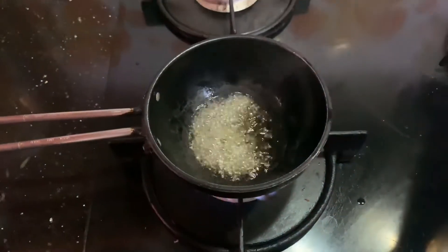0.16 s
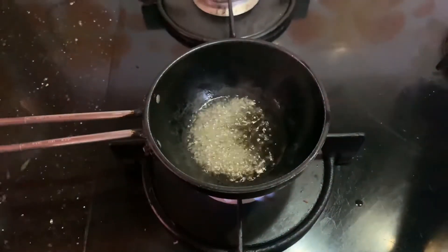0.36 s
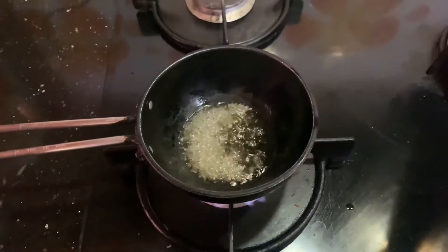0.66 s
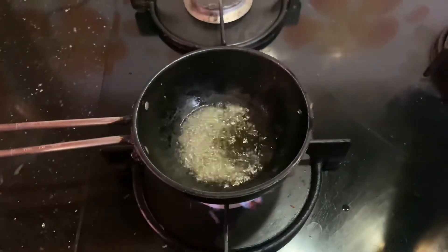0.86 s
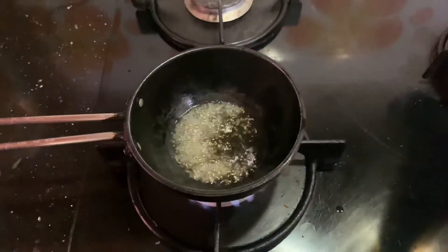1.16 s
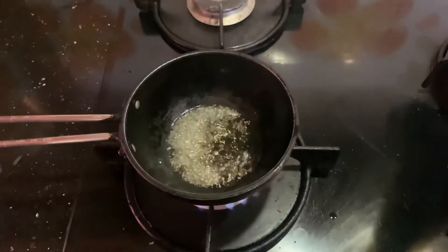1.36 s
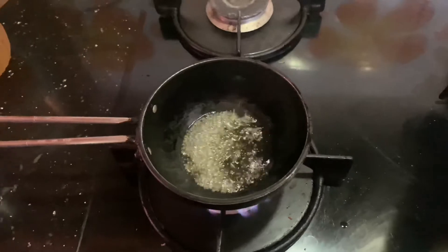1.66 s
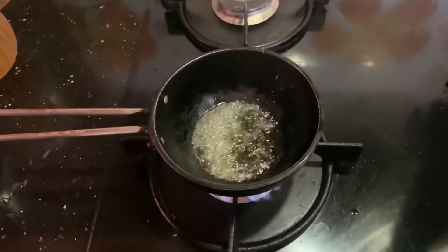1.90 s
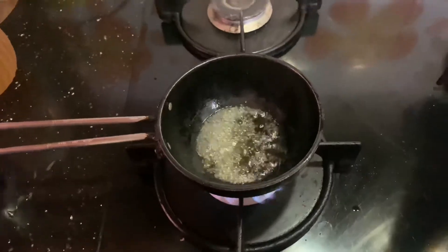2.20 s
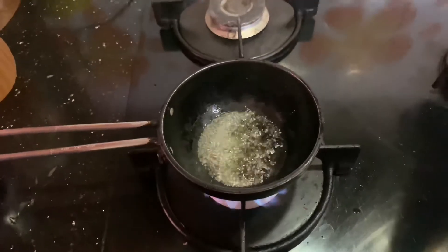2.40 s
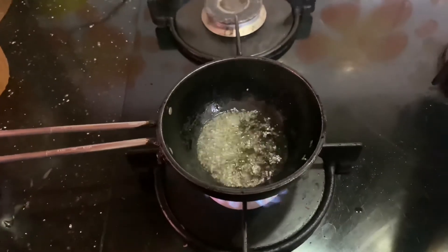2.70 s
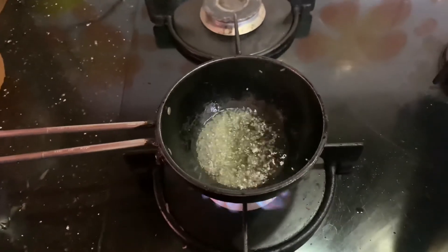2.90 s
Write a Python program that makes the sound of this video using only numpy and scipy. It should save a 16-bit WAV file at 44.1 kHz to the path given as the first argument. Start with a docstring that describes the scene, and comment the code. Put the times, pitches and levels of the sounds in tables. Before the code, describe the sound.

Mustard seeds crackle in hot oil in a small pan, heard very close and dry in stereo. Sparse crisp snaps and short plops begin near 0.2 s, cluster at 0.6-0.7, thin around 1.0, then thicken from 1.6, crowding from 2.3 and peaking near 2.75 before easing. Faint fizz and low flame rumble lie beneath; soft low thuds fall at 0.7, 0.9 and 2.7 s.

```python
"""Mustard seeds burst in hot oil in a small steel pan, a phone held just above it.
From the start a gas flame rumbles and roars, as filtered noise whose level dips at times, under the flickering
noise of fizz and the small crackle of the oil. The first bursts follow: each crack is a short noisy pulse with
a decaying spray, and plops are brief rising tones that set the bowl ringing. Low falling thuds, of lengthening
swings, sound near 0.7, 0.9 and 2.7 s, the last amid bursts that crowd from about 2.3 s and thin out at the end."""
import sys
import numpy as np
from scipy import signal
from scipy.fft import rfft, irfft, next_fast_len
from scipy.io import wavfile
from scipy.ndimage import uniform_filter1d

SR = 44100
rng = np.random.default_rng(int(sys.argv[2]) if len(sys.argv) > 2 else 0)


def voltage_ratio(level):
    """Linear amplitude factor for a level in decibels (scalar or array-like)."""
    return 10 ** (np.asarray(level, float) / 20)


def digitize_waveform(pressure):
    """Quantize a signal to 16-bit integers and store it at the path in sys.argv[1].

    Rows of a 2-D input are taken as channels; values are limited to [-1, 1].
    """
    field = np.atleast_2d(pressure).T
    bounded = np.clip(field, -1, 1)
    quanta = np.round(bounded * 32767).astype(np.int16)
    wavfile.write(sys.argv[1], SR, quanta)


N = 134505

# Cracks of bursting seeds. Each row: start in seconds, relative level in dB, pitch in Hz,
# relative level of the spray in dB.
SEED_CRACKS = [(0.199, -9.5, 7540, -28), (0.406, -18.5, 7400, -36.5), (0.4373, -22.5, 12400, -39),
               (0.482, -14, 12430, -41), (0.5796, -17.5, 8000, -27), (0.611, -19, 10400, -21),
               (0.6174, -8, 12100, -23), (0.6438, -7.5, 11990.0, -29), (0.6542, -7, 13800, -21.5),
               (0.6606, -13, 7800.0, -23), (0.6906, -6.5, 13500, -31), (0.695, -17, 15120.0, -28),
               (0.7017, -6.5, 10200, -27), (0.7063, -16.5, 13010.0, -25), (0.7106, -9.5, 12900.0, -31),
               (0.8765, -11, 13400, -28), (0.89, -11.5, 14000, -24.5), (0.9006, -8, 13200, -36),
               (1.0086, -15, 12700, -35), (1.0303, -11.5, 14100, -41), (1.156, -14.5, 15300, -28.5),
               (1.187, -16, 8820, -24.5), (1.2267, -9.5, 12030, -28.5), (1.2758, -21, 13780.0, -34.5),
               (1.3162, -7.5, 12130, -29), (1.322, -17, 13200, -34), (1.3875, -12, 9960, -42),
               (1.3954, -17.5, 12120.0, -34), (1.4203, -15, 9400, -38), (1.4831, -13.5, 8800, -31.5),
               (1.4936, -19, 8010.0, -32), (1.534, -17, 9070.0, -33), (1.5574, -18.5, 8900, -50),
               (1.5971, -14.5, 7600, -25.5), (1.6113, -7.5, 12040.0, -23), (1.6133, -13, 9200, -27.0),
               (1.6242, -18, 10600, -17), (1.654, -16, 12400, -30), (1.6767, -20.5, 7800, -21.5),
               (1.6866, -8.5, 11300.0, -23), (1.696, -17, 12580.0, -36), (1.732, -14, 5510.0, -25),
               (1.7362, -14, 9220.0, -33.5), (1.7748, -13.5, 8270, -38), (1.8002, -7.5, 13800.0, -30),
               (1.8153, -17.5, 7700, -29), (1.8361, -19, 8850.0, -32), (1.86, -7.5, 12600, -31),
               (1.8754, -10.5, 12770.0, -30.0), (1.884, -9.5, 14700, -27), (1.8956, -10.5, 12210.0, -32),
               (1.9521, -11.5, 8200, -25), (1.9809, -8.0, 14400, -38), (2.0366, -12, 8700, -31),
               (2.0553, -9.5, 13300, -26.0), (2.093, -7.5, 13500, -27), (2.117, -7.5, 8550, -30),
               (2.1538, -8.5, 12400, -29.5), (2.1855, -15.5, 7490.0, -30), (2.2115, -15, 5510.0, -30),
               (2.2258, -11, 12300, -27), (2.2625, -9, 7600, -30.5), (2.2802, -13, 12800, -31),
               (2.297, -13.5, 13030.0, -27), (2.302, -9.5, 8830.0, -26.5), (2.3134, -12, 12100, -31),
               (2.3556, -19, 13500, -37.0), (2.3692, -8.5, 12800, -26), (2.3768, -20, 12360.0, -36),
               (2.381, -17, 8720.0, -36), (2.3916, -12, 12920.0, -25), (2.4066, -13.5, 11000, -22),
               (2.411, -22, 6700.0, -26), (2.4356, -8.5, 14700, -23.5), (2.449, -17.0, 10420.0, -24.5),
               (2.466, -18, 14100, -24.5), (2.48, -15, 7360, -27), (2.493, -22, 8760.0, -34.5),
               (2.5033, -14, 7950.0, -37.5), (2.515, -7, 11860.0, -28), (2.5296, -8, 8900, -21.5),
               (2.5334, -12, 7950, -25), (2.5377, -13, 7200, -29), (2.545, -15, 11700, -31),
               (2.5682, -17, 13160.0, -28), (2.5737, -18, 7150.0, -28), (2.6004, -14, 5370, -23.5),
               (2.6282, -20, 5510.0, -42), (2.691, -18, 6900, -31.0), (2.697, -14, 9000, -33.0),
               (2.7199, -8, 9470, -24.5), (2.726, -19, 14700, -23.5), (2.7367, -21.5, 13330.0, -30.0),
               (2.7467, -9.5, 8310.0, -21), (2.7501, -17, 5460, -23), (2.7594, -9, 7860.0, -20),
               (2.7668, -25, 13980.0, -17.5), (2.7744, -18, 12800, -21), (2.7813, -14.5, 14840.0, -21.5),
               (2.7885, -22, 15100, -25), (2.8203, -28, 8700, -26), (2.8333, -16.5, 11390.0, -29.5),
               (2.8726, -14, 9000, -32), (2.8877, -7.5, 14300, -25.5), (2.93, -9, 13600, -32),
               (2.9491, -11.5, 11540, -23.5), (2.9686, -19, 13090.0, -32.0), (3.0106, -23.5, 14800, -43),
               (3.0228, -33, 9430.0, -50.5), (3.0325, -13.5, 10140.0, -28)]
CRACK_WIDTH_S = .00016  # standard deviation of the bell-shaped pulse
SPRAY_T60_S, SPLASH_T60_S = 0.16, 0.014
DROPLET_WANDER_DB = 6  # per unit of wander
SPRAY_TOP_DB = -5  # at 16 kHz: the late spray is duller than the splash

# Duller plops of steam and oil. Each row: start in seconds, relative level in dB, pitch in Hz,
# relative level of the bowl's ring in dB.
STEAM_PLOPS = [(0.1657, -14, 1290, -23), (0.2012, -22, 4740, -31), (0.365, -16, 990, -37),
               (0.3734, -17.5, 5120, -31), (0.4398, -39, 1290, -35.5), (0.482, -5.5, 3040, -22.5),
               (0.5487, -24.5, 1330, -29.5), (0.5809, -23, 1240, -29), (0.6112, -3.5, 2920, -44),
               (0.6165, -22, 1310, -39), (0.6444, -24, 1370, -38), (0.6532, -22.5, 1220, -35),
               (0.69, -11.5, 5340, -54), (0.7015, -30, 1260, -33), (0.712, -33, 4690, -47),
               (0.877, -8, 4070, -28.5), (0.8996, -20, 1220, -52), (0.994, -29, 3580, -36.5),
               (1.128, -29, 1130, -35), (1.158, -50, 4160, -34), (1.1864, -19, 2830, -26),
               (1.189, -16, 3330, -31), (1.289, -23, 1350, -33.5), (1.396, -46, 1340, -38),
               (1.4735, -26, 1400, -34.5), (1.4822, -26, 1340, -39), (1.6, -11, 5070, -24.5),
               (1.613, -9, 4700, -30), (1.6262, -11, 2890, -22), (1.6551, -6.5, 1810, -24),
               (1.6966, -19, 1300, -25), (1.7041, -16, 1570, -28.5), (1.7308, -8, 5300, -33),
               (1.736, -12.5, 3760, -49), (1.775, -23, 2940, -50), (1.8158, -15, 3560, -28),
               (1.8608, -22, 1300, -33), (1.875, -35, 4010, -38), (1.9446, -21, 1890, -32),
               (1.952, -9, 5400, -34), (2.038, -27, 1330, -42), (2.0925, -17, 5100, -41),
               (2.1153, -21, 3480, -28.5), (2.1855, -16, 4100, -30), (2.198, -9.5, 2750, -25),
               (2.2126, -8.5, 2740, -58), (2.2252, -19, 5140, -42), (2.264, -17.5, 5150, -55),
               (2.273, -27, 1730, -30), (2.283, -14, 3100, -31), (2.3024, -29, 2810, -33.5),
               (2.3163, -28, 4530, -41), (2.337, -20, 2930, -55), (2.3707, -36, 5060, -36),
               (2.3819, -6.5, 2650, -30.5), (2.3909, -9, 2770, -33), (2.4067, -15, 4900, -34),
               (2.433, -7.5, 2760, -39), (2.449, -16, 3740, -33), (2.4657, -8, 3630, -33),
               (2.4809, -6.5, 3680, -33), (2.515, -12, 2750, -31), (2.53, -23, 3020, -26),
               (2.5337, -10, 3140, -24.5), (2.575, -24, 2840, -28.5), (2.586, -26, 1440, -36),
               (2.6, -6.5, 4970, -32), (2.6286, -10, 4150, -26), (2.6693, -13.5, 1670, -30.5),
               (2.692, -9, 2950, -43), (2.697, 2, 3030, -23), (2.7131, -8, 3030, -29),
               (2.7258, -1, 2600, -29), (2.7466, -3, 4950, -40), (2.7498, -13, 4170, -27),
               (2.7606, -7, 2730, -22.5), (2.7666, -13, 4350, -34), (2.7806, -8, 4300, -36),
               (2.79, -9, 4740, -51), (2.8308, -9, 2970, -55), (2.8692, -20, 2470, -33),
               (2.889, -43, 1290, -34), (2.9301, -25, 2480, -30), (2.9486, -34, 5170, -30),
               (3.0233, -5.5, 2340, -23.5)]
PLOP_DECAY_CYCLES = 2.03
ROUGHNESS = 2.8  # per unit of wander
EDGE_DB_PER_OCT = 4  # low plops have a softer edge
NEAR_DB_PER_OCT = 6  # a plop favours the modes near its own pitch

# Modes of the steel bowl. Each row: frequency in Hz, relative level in dB, 60 dB decay time in seconds.
BOWL_MODES = [(1004, -10.5, 0.067), (1249, -5.5, 0.06), (1468, -3.5, 0.028), (1883, -8, 0.029),
              (2388, -13.5, 0.12), (2750, -7, 0.16), (2995, -6, 0.13), (3335, -6, 0.041),
              (3970, -9.5, 0.055), (4740, -14.5, 0.036)]

# Low thuds. Each row: start in seconds, level in dB.
LOW_THUDS = [(0.7113, -23), (0.9014, -16), (2.721, -21.5)]
THUD_PHASE_ZERO_S, THUD_TURNS_PER_EFOLD, THUD_T60_S = .0018, .89, .068

# Activity of the oil. Each row: time in seconds, relative level in dB.
OIL_ACTIVITY = [(0.0, -35), (0.33, -42), (0.45, -40), (0.56, -33.5), (0.97, -45.5), (1.15, -41),
                (1.37, -35.5), (1.48, -40), (1.77, -30.5), (1.96, -40.5), (2.14, -31.5), (2.29, -36),
                (2.64, -33), (2.88, -35), (3.05, -32.5)]
CRACKS_PER_S, PLOPS_PER_S = 330, 150
CRACKLE_SPREAD_DB = 3.5  # mean of the exponential law, before its tail is cut

# Spectrum of the fizz. Each row: frequency in Hz, relative density in dB per Hz.
FIZZ_SPECTRUM = [(1000, -21), (2000, -3.5), (3000, -7.5), (5000, -0.5), (8000, 2), (12000, -0.5),
                 (14300, -2.5), (15000, -20), (17000, -29)]

# Level of the low roar and rumble as heard, with dips. Each row: time in seconds,
# relative roar level in dB, relative rumble level in dB.
LOW_LEVEL = [(0.0, -50.5, -42), (0.09, -56.5, -51), (0.18, -50, -37), (0.22, -62.5, -49), (0.41, -49, -35),
             (0.58, -53, -48), (0.61, -52.5, -67), (0.64, -48, -42.5), (0.74, -63.5, -39),
             (0.78, -54.5, -55), (0.93, -59.5, -40), (0.97, -71, -71), (1.09, -61, -60), (1.15, -53.5, -48),
             (1.29, -58, -46.5), (1.55, -53, -43), (1.61, -53.5, -51), (1.65, -50.5, -46.5),
             (2.12, -57, -45), (2.2, -56.5, -53.5), (2.34, -53.5, -44), (2.66, -55.5, -48),
             (2.74, -53.5, -41.5), (2.76, -53, -45), (3.01, -57, -65), (3.05, -50.5, -60)]
# Spectrum of the roar. Each row: frequency in Hz, relative density in dB per Hz.
ROAR_SPECTRUM = [(53, -7.5), (90, 1.5), (157, -3), (516, -10.5), (758, -16.5), (965, -16.5), (1080, -15.5),
                 (1260, -6.5), (1600, -16), (2080, -57), (3520, -120)]
RUMBLE_HZ, RUMBLE_WIDTH_HZ = 63.4, 17.6

LEFT_LATE_S, LEFT_TURN_RAD = 0.0003044, 1  # sound through the air
PORT_HZ, PORT_Q = 2850, 1.59  # cavity of the right port, turning the phase of the bowl's sound
TOP_HZ = 15900  # upper edge of the phone's band
LIMIT = .97  # full scale is 1


def bursts():
    """Superposition: the loud seeds add the pressures of their cracks and plops."""
    return pops(*np.array(SEED_CRACKS, float).T) + plops(*np.array(STEAM_PLOPS, float).T)


def pops(s, db, hz, spray_db):
    """Impulsive radiation: a crack of a few cycles, a brief splash, then a decaying spray of droplets."""
    t = np.arange(64) / SR
    chance = rng.standard_normal((len(s), 65))
    bell = np.exp(-.5 * ((t - 24 / SR) / CRACK_WIDTH_S) ** 2)
    tone = np.cos(2 * np.pi * hz[:, None] * t + 3 * chance[:, :1])
    snap = bell * (tone + .6 * chance[:, 1:])
    crack = place(s - 28 / SR, voltage_ratio(db + 3.5)[:, None] * snap)
    crack = band(band(crack, 7800, 18800), 3400, 18200)

    def fading(level_db, t60):
        """Energy decay: every burst adds power, which falls by 60 dB in t60 seconds."""
        power = place(s + .0003, voltage_ratio(level_db)[:, None] ** 2)
        decay = np.exp(-np.log(1e6) / (t60 * SR))
        return np.sqrt(signal.lfilter([1], [1, -decay], power))

    hiss = flicker(6.1, 150) * voltage_ratio(DROPLET_WANDER_DB * walk(1200))
    dull_hiss = shape(hiss, [(5000, 0.012), (16000, SPRAY_TOP_DB)])
    splash = fading(db - 17.5, SPLASH_T60_S) * hiss
    spray = splash + fading(spray_db - 7, SPRAY_T60_S) * dull_hiss
    return ports(crack + spray[0], np.zeros(N), 1.336 * spray[1:])


def plops(s, db, hz, ring_db):
    """Forced and free vibration: a few rising cycles with a rough edge also strike the bowl's modes."""
    u = np.arange(900) / SR
    chance = rng.standard_normal((len(s), 916))
    start = s - .0007
    turns = hz[:, None] * u
    cycles = np.sin(2 * np.pi * turns * (1 + 0.0049 * turns))
    cycles = cycles * np.exp(-turns / PLOP_DECAY_CYCLES) * (1 - np.exp(-turns / 2.17))
    bowl = place(start, voltage_ratio(db + 3.0)[:, None] * cycles) * (1 + ROUGHNESS * walk(1500))
    edge = np.exp(-u / 0.0005) * chance[:, 16:] * (1 - np.exp(-u / 0.00017))
    edge_db = db - 3.0 + EDGE_DB_PER_OCT * np.log2(hz / 3000)
    knock = band(place(start, voltage_ratio(edge_db)[:, None] * edge), 2230, 6800)
    for k, (f, mode_db, t60) in enumerate(BOWL_MODES):
        octaves_away = abs(np.log2(f / hz))
        strike_db = ring_db + mode_db + 3.0 - NEAR_DB_PER_OCT * octaves_away + 2.8 * chance[:, k]
        strike = place(start, voltage_ratio(strike_db)[:, None])
        bowl += ring(strike, f, t60) * (1 + ROUGHNESS * walk(300))
    bowl = no_bass(bowl)
    return ports(0.16 * knock, bowl + 0.87 * knock, 0)


def thuds():
    """Dispersion: a droplet hits the microphone; high-pass filters spread the knock into lengthening swings."""
    u = np.arange(1, 6000) / SR
    # the phase grows as the logarithm of time, so the frequency falls
    swing = np.cos(2 * np.pi * THUD_TURNS_PER_EFOLD * np.log(u / THUD_PHASE_ZERO_S))
    swing = swing * (1 - np.exp(-(u / .0017) ** 3))  # soft onset
    swing = swing * np.exp(-np.log(1000) * u / THUD_T60_S)
    rows = np.array(LOW_THUDS)
    return place(rows[:, 0], voltage_ratio(rows[:, 1])[:, None] * swing)


def crackle():
    """Random superposition: small cracks and plops at chance moments follow the activity of the oil."""
    def chance_events(rate):
        """Uniform chance in time: starts, levels with an exponential spread, and the draws themselves."""
        u = rng.random((int(rate * N / SR), 4)).T
        s = 0.0017 + u[0] * (N / SR - .002)
        activity_db = table(OIL_ACTIVITY, 1)[(s * SR).astype(int)]
        return s, activity_db - CRACKLE_SPREAD_DB * np.log(1 - .97 * u[1]), u

    s, db, u = chance_events(CRACKS_PER_S)
    cracks = pops(s, db - 11.5, 5000 * 2.68 ** u[2], db - 18 + 6 * u[3])
    s, db, u = chance_events(PLOPS_PER_S)
    return cracks + plops(s, db - 12, 1800 * 3.0 ** u[2], db - 24 + 12 * u[3])


def fizz():
    """Broadband noise: the fine hiss of boiling oil, with the bowl's modes sounding under random forcing."""
    activity_db = table(OIL_ACTIVITY, 1)
    hiss = flicker(4, 40)
    hiss = hiss * voltage_ratio(activity_db - 9.0 + 12 * walk(36.58))
    modes = sum(voltage_ratio(db) * ring(rng.standard_normal(N), f, t60) for f, db, t60 in BOWL_MODES)
    hum = unit(no_bass(modes)) * voltage_ratio(activity_db - 25 + 6.7 * walk(32.3))
    return ports(hiss[0], hum, 0.31 * hiss[1:])


def flame():
    """Combustion noise: a broad roar and a deep narrow-band rumble, each partly shared by the two ports."""
    roar = unit(shape(rng.standard_normal((3, N)), ROAR_SPECTRUM))
    side = band(roar[1:], 370, 2000)  # differs between the ports
    roar = (roar[0] + 0.97 * side) * voltage_ratio(table(LOW_LEVEL, 1) + 5.0 + 0.76 * walk(20.7))
    lo, hi = RUMBLE_HZ - RUMBLE_WIDTH_HZ / 2, RUMBLE_HZ + RUMBLE_WIDTH_HZ / 2
    deep = unit(band(rng.standard_normal((3, N)), lo, hi))
    deep = (deep[0] + 0.39 * deep[1:]) * voltage_ratio(table(LOW_LEVEL, 2) - 2.5)
    return roar + deep * voltage_ratio(np.array([[-.8], [.8]]))  # rumble stronger on the right


def flicker(depth_db, rate):
    """Amplitude modulation: three noises with the fizz spectrum, whose bands each flicker on their own."""
    x = unit(shape(rng.standard_normal((3, N)), FIZZ_SPECTRUM))
    edges = [900, 2200, 3600, 5500, 8000, 11500, 17500]  # Hz
    bands = [band(x, lo, hi) * voltage_ratio(depth_db * walk(rate)) for lo, hi in zip(edges, edges[1:])]
    return unit(sum(bands))


def ring(x, hz, t60):
    """Resonance: one damped mode struck by x, falling by 60 dB in t60 seconds."""
    r, w = np.exp(-np.log(1000) / (t60 * SR)), 2 * np.pi * hz / SR
    return signal.lfilter([0, r * np.sin(w)], [1, -2 * r * np.cos(w), r * r], x)


def no_bass(x):
    """Radiation efficiency: a small bowl radiates little at low frequency."""
    return signal.sosfilt(signal.butter(8, 1060, "high", fs=SR, output="sos"), x)


def ports(air, bowl, diffuse):
    """Path difference: air sound reaches the right port first, bowl sound the left; diffuse sound differs."""
    flat = [(1, 0), (2, 0)]
    left_air = shape(air, flat, LEFT_LATE_S, LEFT_TURN_RAD)
    w = 2 * np.pi * PORT_HZ / SR
    half_width = np.sin(w) / (2 * PORT_Q)
    a = [1 + half_width, -2 * np.cos(w), 1 - half_width]
    right_bowl = signal.lfilter(a[::-1], a, bowl)  # all-pass
    return np.array([left_air + bowl, air + right_bowl]) + diffuse


def table(rows, col):
    """Linear interpolation: a curve over time from one column."""
    rows = np.array(rows)
    return np.interp(np.arange(N) / SR, rows[:, 0], rows[:, col])


def shape(x, points, late_s=0., turn=0.):
    """Linear filtering: colour by (Hz, dB) points, a delay and a turn of phase in radians."""
    n = next_fast_len(N + 4096)
    f, p = np.arange(n // 2 + 1) * SR / n + 1e-3, np.array(points)
    gain = voltage_ratio(np.interp(np.log(f), np.log(p[:, 0]), p[:, 1]))
    gain = gain * np.exp(1j * (turn - 2 * np.pi * f * late_s))
    return irfft(rfft(x, n) * gain, n)[..., :N]


def unit(x):
    """Normalisation to an rms of 1."""
    return x / np.sqrt(np.mean(x ** 2))


def band(x, lo_hz, hi_hz):
    """Band-pass filtering between two edges."""
    return signal.sosfilt(signal.butter(2, [lo_hz, hi_hz], "band", fs=SR, output="sos"), x)


def walk(rate):
    """Smoothed noise: a random wander about zero with a standard deviation near 0.27, rate draws per second."""
    k = int(SR / rate)
    steps = np.repeat(rng.standard_normal(N // k + 1), k)
    return 0.36 * uniform_filter1d(uniform_filter1d(steps, k), k)[:N]


def place(times, shapes):
    """Superposition of short shapes at their times."""
    out = np.zeros(N + shapes.shape[1])
    at = np.clip((times * SR).astype(int), 0, N - 1)[:, None] + np.arange(shapes.shape[1])
    np.add.at(out, at, shapes)
    return out[:N]


def scene():
    """Superposition of all sources at the two ports."""
    return bursts() + crackle() + fizz() + flame() + thuds()


def low_pass(x):
    """Removes everything above the highest recorded frequency."""
    return signal.sosfilt(signal.butter(12, 17140, fs=SR, output="sos"), x)


def record(dry):
    """Band limitation and saturation: the phone cuts the extremes and rounds the peaks."""
    x = signal.sosfilt(signal.cheby1(10, .5, TOP_HZ, fs=SR, output="sos"), dry)
    x = signal.sosfilt(signal.butter(2, 40, "high", fs=SR, output="sos"), x)
    mix = x / (1 + (x / LIMIT) ** 6) ** (1 / 6)
    return low_pass(mix)


dry = scene()
out = record(dry)
digitize_waveform(out)
```